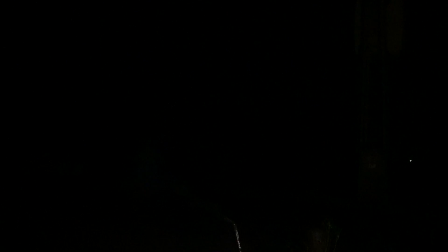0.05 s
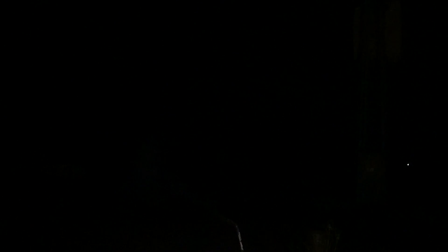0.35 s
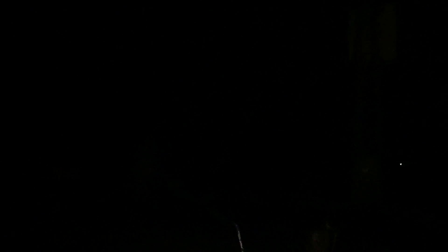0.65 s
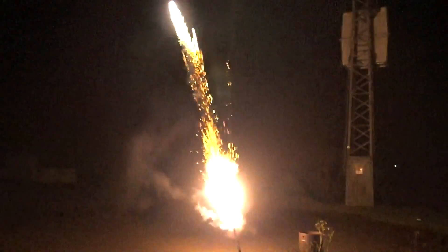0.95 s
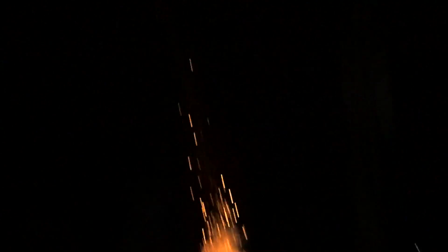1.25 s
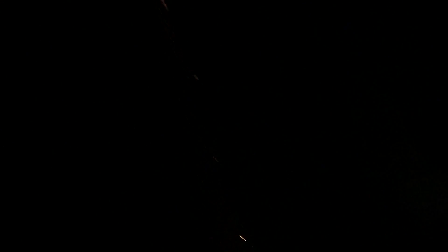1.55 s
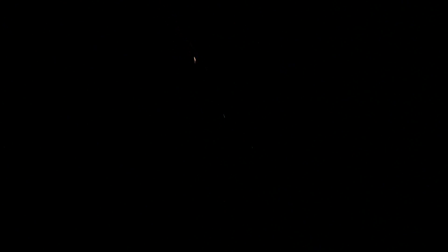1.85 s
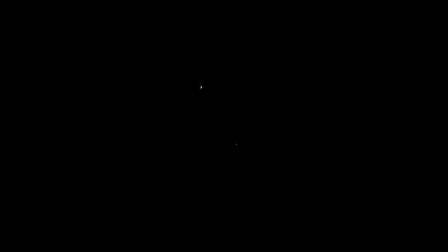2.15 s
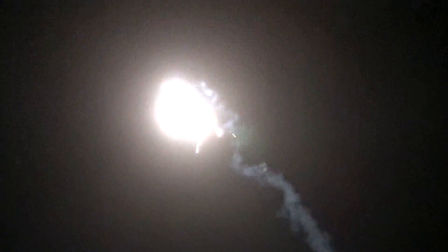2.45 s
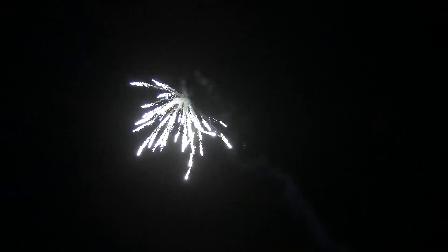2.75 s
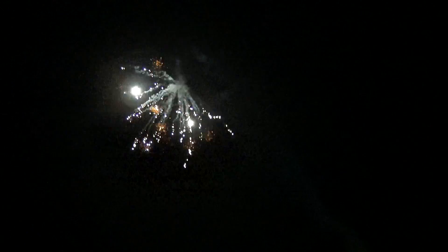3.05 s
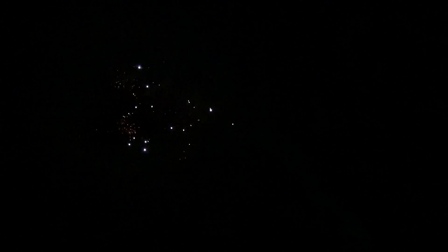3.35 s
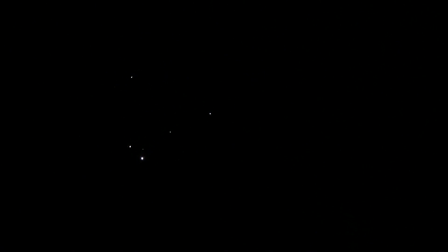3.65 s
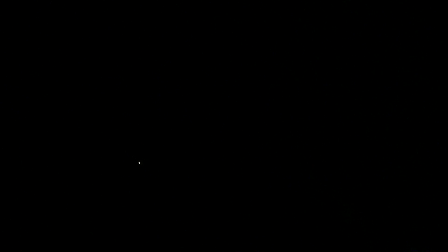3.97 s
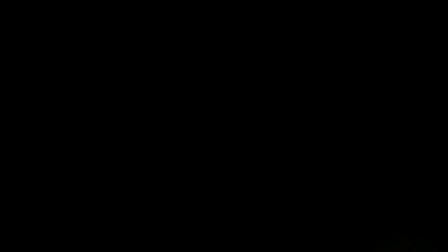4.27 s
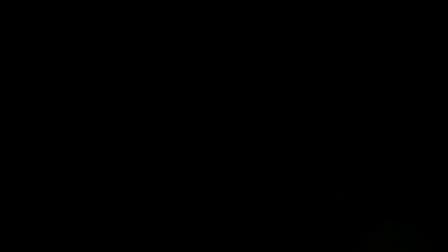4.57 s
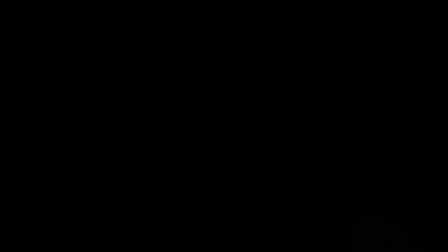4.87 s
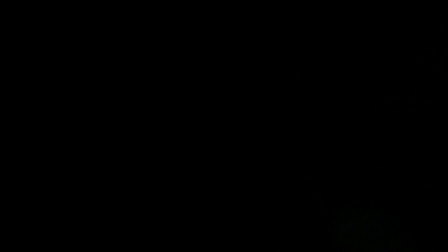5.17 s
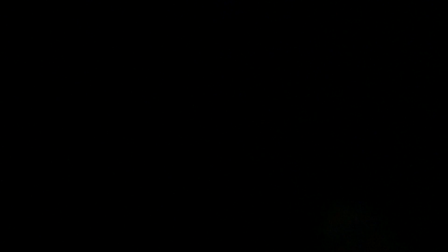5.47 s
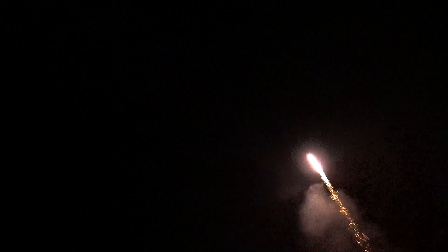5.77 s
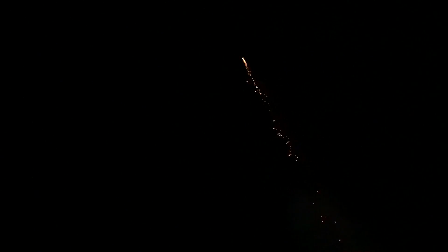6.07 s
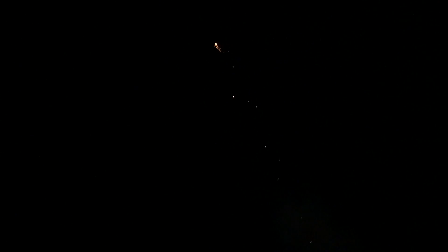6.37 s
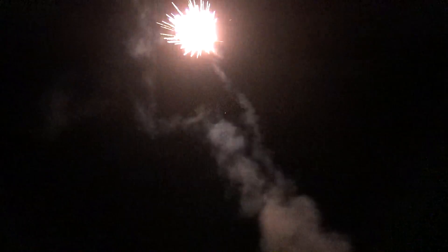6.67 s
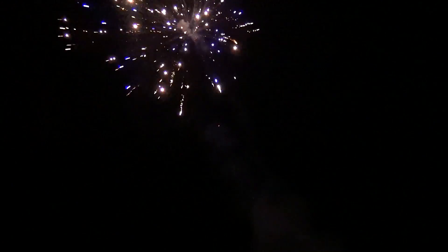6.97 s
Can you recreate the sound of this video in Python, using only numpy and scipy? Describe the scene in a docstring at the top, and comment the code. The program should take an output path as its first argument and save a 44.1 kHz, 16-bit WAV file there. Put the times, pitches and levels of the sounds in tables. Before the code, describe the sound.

After a few small knocks in a faint breeze, a large firework tube fires with a loud thump. The shell hums faintly as it climbs, then bursts overhead with a sharp bang and a flurry of crackling stars. A soft echo returns from far away. A second shell launches and bursts the same way, without crackle. Each blast rolls across open ground and briefly overloads the microphones.

```python
"""A faint breeze and a few small knocks, then a thump: a large firework tube fires the first of two shells.
Each hums upward through the night and bursts high overhead; the first throws out crackling stars.
Every blast is a shock wave that slaps off nearby structures and rolls over the land as reverberation,
and the first burst comes back late from far off. The blasts overload a pair of microphones."""
import sys
import numpy as np
from scipy import signal
from scipy.fft import rfft, irfft, next_fast_len
from scipy.io import wavfile

SR = 44100
rng = np.random.default_rng(int(sys.argv[2]) if len(sys.argv) > 2 else 0)


def store_wav(level_fs):
    """Save 16-bit WAV to argv[1]."""
    pcm = np.round(np.clip(np.atleast_2d(level_fs), -1, 1) * 32767)
    wavfile.write(sys.argv[1], SR, pcm.T.astype(np.int16))


N = 309611
T = np.arange(N) / SR


def undb(db):
    """Decibels to amplitude ratio."""
    return 10 ** (np.asarray(db) / 20)


def unit(x):
    """Normalisation to rms 1."""
    return x / np.sqrt(np.mean(x ** 2))


def butter(x, hz, kind, order=2):
    """Causal low-pass or high-pass filter."""
    return signal.sosfilt(signal.butter(order, min(hz, .45 * SR), kind, fs=SR, output="sos"), x)


def colour(x, spectrum):
    """Spectral shaping by an outline of (frequency_hz, gain_db) points."""
    size = next_fast_len(x.shape[-1])
    hz, db = np.transpose(spectrum)
    gain = undb(np.interp(np.log(np.fft.rfftfreq(size, 1 / SR) + 1), np.log(hz), db))
    return irfft(rfft(x, size) * gain, size)[..., :x.shape[-1]]


def resonate(x, hz, width_hz):
    """A single resonance, gain 1 at its centre."""
    return signal.lfilter(*signal.iirpeak(hz, hz / width_hz, fs=SR), x)


def add(out, start_s, sound):
    """Superposition: a sound joins the mix at its start time."""
    i = max(int(start_s * SR), 0)
    part = sound[..., :max(N - i, 0)]
    out[:, i:i + part.shape[-1]] += part


def wander(rate_hz):
    """Slow random modulation: straight lines between random values."""
    knots = rng.standard_normal(N // 20)
    return 1.83 * np.interp(T * rate_hz, np.arange(len(knots)), knots)


def swell_at(centre_s, half_s):
    """A bell-shaped envelope around a moment."""
    return np.exp(-((T - centre_s) / half_s) ** 2)


def microphone_pair(wave, lag_samples):
    """Path difference: an oblique wave reaches one microphone before the other."""
    return np.array([np.pad(wave, (10 + lag, 10 - lag)) for lag in (0, lag_samples)])


# How unlike the two microphones hear diffuse sound: frequency_hz, side_over_mid_db
STEREO_WIDTH = [(25, -4.5), (60, -17), (125, -17.5), (250, -12.5), (500, -10.5), (1000, -8.5), (2000, -5),
                (4000, -1.5), (12000, 0.5)]
def diffuse(uneven_db):
    """Diffuse field: dense, uneven arrivals from all sides, partly coherent at two close microphones."""
    strength = undb(uneven_db * np.repeat(rng.standard_normal(N // 32 + 1), 32)[:N])
    mid, side = rng.standard_normal((2, N)) * strength
    side = colour(side, STEREO_WIDTH)
    return unit(np.array([mid + side, mid - side]))


def band(hz, half_width_hz):
    """Narrow-band noise: random modulation spreads a steady or gliding tone into a breathy band."""
    phase = 2 * np.pi * np.cumsum(np.broadcast_to(hz, N)) / SR
    flutter = butter(diffuse(uneven_db=1.5), half_width_hz, "low")
    return unit(flutter * np.cos(phase) + flutter[:, ::-1] * np.sin(phase))


# Spectrum of the night air: frequency_hz, gain_db
AIR_SPECTRUM = [(15, -9.5), (30, 4), (45, -5), (70, -17.5), (200, -19.5), (450, -27.5), (1000, -29),
                (2500, -35), (5000, -42.5), (9000, -44.5), (16000, -47.5)]
# Gusts on the microphones: centre_s, level_db, half_length_s
WIND_GUSTS = [(1.466, -40, 0.16), (2.1, -46, 0.68), (3.8, -50.5, 0.39), (4.267, -37, 0.037),
              (6.3, -47.5, 0.39)]
# Course of the distant hush: time_s, level_db
HUSH_LEVELS = [(0, -45.5), (2.3, -47), (4.1, -49), (7, -45.5)]
def night_air(breeze_db=-52):
    """Wind noise: a light, gusty breeze rumbles on the microphones over a faint distant hush."""
    air = unit(colour(diffuse(uneven_db=-1), AIR_SPECTRUM))
    gust_power = sum((undb(db) * swell_at(s, half_s)) ** 2 for s, db, half_s in WIND_GUSTS)
    breeze = np.sqrt(undb(breeze_db) ** 2 + gust_power)
    rumble = butter(air, 115, "low") * breeze * undb(2 * wander(4.5))
    hush_db = np.interp(T, *np.transpose(HUSH_LEVELS)) + 0.46 * wander(9)
    return rumble + butter(air, 83, "high") * undb(hush_db)


# Small knocks, scuffs and distant snaps: start_s, level_db, pitch_hz, decay_s
KNOCKS = [(0.065, -43, 1010, .01), (0.106, -36, 200, 0.0035), (0.284, -38.5, 2450, 0.0037),
          (0.293, -33, 2070, 0.0026), (0.3, -40, 3000, 0.0056), (0.311, -46.5, 3160, 0.026),
          (0.549, -42.5, 394, 0.011), (0.575, -33.5, 370, 0.015), (0.584, -39, 920, 0.088),
          (0.597, -29.5, 795, 0.0056), (0.643, -43, 780, 0.0046), (0.724, -57, 1700, 0.0036),
          (0.82, -43.5, 200, 0.02), (0.86, -44, 252, 0.017), (4.35, -45, 4500, 0.0038),
          (4.625, -33.5, 1250, 0.044)]
def knocks():
    """Damped resonance: each short, dull contact dies away in one broad band."""
    out, grit = np.zeros((2, N)), diffuse(uneven_db=4)
    size = SR // 4
    age = T[:size]
    for k, (start_s, db, hz, decay_s) in enumerate(KNOCKS):
        contact = butter(grit[:, k * size:(k + 1) * size], 4 * hz, "low", order=1)
        ring = unit(resonate(contact, hz, width_hz=1.2 * hz))
        envelope = np.minimum(age / (0.11 * decay_s), 1) * np.exp(-age / decay_s)
        add(out, start_s, undb(db) * ring * envelope)
    return out


def far_echo(crest_s=4.03, rise_db_per_s=35, fade_db_per_s=7.5, return_s=4.11, from_hz=790, to_hz=581):
    """Long-path echo: the first burst returns as a soft band that sinks as the path grows longer."""
    before, after = np.maximum(crest_s - T, 0), np.maximum(T - crest_s, 0)
    core = band(to_hz + (from_hz - to_hz) * np.exp(-after / .36), half_width_hz=189)
    skirt_spectrum = [(100, -16), (350, -8.5), (700, -1.5), (1500, -5), (3000, -19.5), (6000, -50)]
    skirt = undb(-5) * unit(colour(diffuse(uneven_db=2.5), skirt_spectrum))
    wash = undb(-37 - rise_db_per_s * before - fade_db_per_s * after)
    # one strong return stands out just after the crest of the wash
    strong = np.where(T < return_s, swell_at(return_s, 0.064), np.exp(-abs(T - return_s) / 0.085))
    envelope = np.hypot(wash, undb(-33) * strong) * undb(0.33 * wander(25))
    return (T > SHELL_BURSTS[0][0]) * (core + skirt) * envelope


def roll(start_s, shape, spectrum, echoes, attack_s, swell_db, treble_attack_s,
         fade_db_per_s, boom_db, boom_decay_s):
    """Reverberation: reflections off ground and trees swell as more land is reached, then fall away."""
    level_db, treble_db, hold_s, release_db_per_s, late_db = shape
    age = np.maximum(T - start_s, 0)
    field = colour(diffuse(uneven_db=2), spectrum)
    body, treble = (unit(butter(field, 1800, kind, order=4)) for kind in ("low", "high"))
    echo_power = sum((undb(db) * swell_at(start_s + delay_s, half_s)) ** 2
                     for delay_s, db, half_s in echoes)

    def envelope(rise_s, held_s, echo_db):
        """Attack, hold and release; the late echoes add in power."""
        past = np.maximum(age - held_s, 0)
        late_power = undb(late_db) ** 2 * (undb(-fade_db_per_s * past) ** 2
                                           + undb(echo_db) ** 2 * echo_power)
        return np.minimum(age / rise_s, 1) * np.sqrt(undb(-release_db_per_s * past) ** 2 + late_power)

    # a low boom comes first; the treble arrives later and leaves sooner
    boom = unit(butter(colour(diffuse(uneven_db=-1.5), spectrum), 378, "low", order=4))
    boom *= undb(boom_db) * np.minimum(age / attack_s, 1) * np.exp(-age / boom_decay_s)
    body *= envelope(attack_s, hold_s, echo_db=0) * undb(-swell_db * np.maximum(1 - age / hold_s, 0))
    treble *= envelope(treble_attack_s, 0.9 * hold_s, echo_db=-2.5) * undb(treble_db)
    return undb(level_db + 0.93 * wander(70)) * (boom + body + treble)


# The roll of each lift and each burst: level_db, treble_gain_db, hold_s, release_db_per_s, late_gain_db
LIFT_ROLL_SHAPES = [(-17.5, -2.5, 0.18, 131, -16), (-17, -8.5, 0.14, 127, -22)]
BURST_ROLL_SHAPES = [(-14.5, -11.5, 0.2, 170, -7), (-13.5, -11.5, 0.2, 85, -20)]
# Spectra of the rolls: frequency_hz, gain_db
LIFT_ROLL_SPECTRUM = [(25, -16), (70, -1.5), (120, 9), (250, 6), (600, 10.5), (1000, 6.5), (1700, -9),
                      (3500, -20.5), (8000, -30), (10000, -36.5), (16000, -45)]
BURST_ROLL_SPECTRUM = [(25, -32), (70, -13.5), (150, -8), (300, -5), (600, 1.5), (1000, -3), (1700, -9),
                       (3500, -13.5), (8000, -25.5), (10000, -29), (16000, -42.5)]
# Broad echoes from the surroundings: delay_s, gain_over_late_db, half_length_s
LIFT_ECHOES = [(0.303, 5.5, 0.029), (0.404, -1.5, 0.027), (.55, -7, .03)]
BURST_ECHOES = [(.297, -1, 0.022), (.455, -1.5, 0.065)]
def rolls():
    """Fixed echo paths: blasts from the same spot roll over the land with the same delays."""
    ground = sum(roll(lift[0], shape, LIFT_ROLL_SPECTRUM, LIFT_ECHOES, attack_s=0.025, swell_db=3.5,
                      treble_attack_s=0.053, fade_db_per_s=28, boom_db=-8, boom_decay_s=0.087)
                 for lift, shape in zip(LIFT_CHARGES, LIFT_ROLL_SHAPES))
    sky = sum(roll(burst[0], shape, BURST_ROLL_SPECTRUM, BURST_ECHOES, attack_s=.015, swell_db=3,
                   treble_attack_s=0.079, fade_db_per_s=21, boom_db=-1.5, boom_decay_s=0.15)
              for burst, shape in zip(SHELL_BURSTS, BURST_ROLL_SHAPES))
    return ground + sky


# Modes of the hum: harmonic_number, half_width_hz, gain_db
HUM_MODES = [(1, 77, 5.5), (3, 78, 3.5), (5, 150, -1), (7, 150, -6.5)]
# Climbing shells: start_s, end_s, start_pitch_hz, end_pitch_hz, hum_db, rolloff_db_per_octave,
# hiss_crest_s, hiss_db, hiss_fade_s
SHELL_FLIGHTS = [(1.451, 2.399, 950, 875, -52.5, 4, 1.94, -61, 0.55),
                 (6.029, 6.805, 547.4, 525, -56.5, -2.5, 6.32, -54, 0.44)]
def flights():
    """Stopped-pipe resonance: a shell hums in odd harmonics, sagging as it slows; its tail fizzes."""
    out = np.zeros((2, N))
    hiss_spectrum = [(1000, -16.5), (4000, 1), (8500, 2), (11000, -7), (16000, -11)]
    for start_s, end_s, from_hz, to_hz, hum_db, rolloff, crest_s, hiss_db, fade_s in SHELL_FLIGHTS:
        pitch_hz = np.interp(T, [start_s, end_s], [from_hz, to_hz])
        hum = unit(sum(undb(db - rolloff * np.log2(k)) * band(k * pitch_hz, half_width_hz)
                       for k, half_width_hz, db in HUM_MODES))
        hiss = unit(colour(diffuse(uneven_db=1), hiss_spectrum)) * np.exp(-abs(T - crest_s) / fade_s)
        burning = np.clip((T - start_s) / 0.076, 0, 1) * (T < end_s)
        out += burning * (undb(hum_db) * hum + undb(hiss_db) * hiss)
    return out


# Gas escaping just before each shell leaves: centre_s, pitch_hz, half_width_hz, level_db, half_length_s
GAS_SQUEALS = [(0.955, 3410, 900, -23, 0.012), (5.675, 4440, 110, -37, 0.014)]
def squeals():
    """Flow noise: gas squeals briefly through the gap between shell and tube."""
    return sum(undb(db) * band(hz, half_width_hz) * swell_at(centre_s, half_s)
               for centre_s, hz, half_width_hz, db, half_s in GAS_SQUEALS)


def shock(pulse_ms, low_hz, top_hz):
    """Blast wave: a sudden overpressure, then a longer shallow suction; air rounds the front."""
    age = T[:SR // 25] / (pulse_ms / 1000)  # in pulse lengths
    pressure = (1 - age) * np.exp(-age)
    wave = butter(butter(pressure, low_hz, "high", order=1), top_hz, "low")
    return wave / wave.max()


def lesser_stars(count=36, start_s=3.04, end_s=3.44):
    """Random ignition: the lesser stars go off at irregular moments while the cloud burns."""
    jitter, size = rng.random((count, 2)).T
    times_s = start_s + (end_s - start_s) * (np.arange(count) + jitter) / count
    levels_db = 2.5 - rng.standard_normal(count)
    pulses_ms = 0.24 * 2 ** (size - .5)
    return list(zip(times_s, levels_db, pulses_ms))


# The loudest crackling stars: start_s, level_db, pulse_ms
LOUD_STARS = [(2.703, 4, 0.086), (3.0007, 14, 0.084), (3.0085, 5.5, 0.21), (3.0149, 1, 0.17),
              (3.0381, 10, 0.18), (3.0441, 12, 0.074), (3.0625, 12.5, 0.099), (3.0707, 10, 0.19),
              (3.1083, 10, 0.071), (3.1264, 8, 0.18), (3.1505, 10, 0.19), (3.154, 4, 0.2),
              (3.1591, 8, 0.24), (3.1742, 6, 0.068), (3.204, 13, 0.1), (3.2097, 10.5, 0.15),
              (3.214, 12, 0.14), (3.2185, 7, 0.095), (3.2207, 11.5, .17), (3.2419, 5, 0.21),
              (3.2566, 8, 0.105), (3.2594, 8, 0.066), (3.2888, 10, .18), (3.3095, 10, 0.19),
              (3.3265, 12.5, 0.11), (3.3356, 11, .19), (3.3497, 5.5, 0.26), (3.3714, 7, .18),
              (3.3921, 10.5, .21), (3.3988, 8, 0.21), (3.4181, 12.5, 0.22), (3.4267, 9.5, 0.23),
              (3.4317, -3, 0.36), (3.4767, 11.5, 0.26), (3.4845, 5.5, 0.31), (3.4916, 10, 0.22)]
def crackle():
    """Scattering: stars explode as tiny blast waves, each from its own bearing; the ground echoes them."""
    direct, stars = np.zeros((2, N)), list(LOUD_STARS) + lesser_stars()
    for (start_s, db, pulse_ms), (pan, bearing) in zip(stars, rng.random((len(stars), 2))):
        wave = undb(db) * shock(pulse_ms, low_hz=420, top_hz=11500)
        balance = undb(np.array([[2.5], [-2.5]]) * (pan - .5))
        add(direct, start_s, balance * microphone_pair(wave, int(7 * (bearing - .35))))
    echo = ground_scatter(direct)
    # the low end of the scatter follows the smoothed power of the pops
    smoothing = 1 / (.03 * SR)
    power = signal.lfilter([smoothing], [1, smoothing - 1], direct[0] ** 2)
    thud_spectrum = [(30, -24), (130, 2), (350, -3), (900, 0.5), (4000, -21)]
    thud = unit(colour(diffuse(uneven_db=3.5), thud_spectrum)) * np.sqrt(power)
    bright_edge = resonate(direct, hz=7350, width_hz=2700)
    return undb(-2.5) * direct + undb(-11) * bright_edge + echo + undb(-15.5) * thud


# Spectrum of the stars' echo: frequency_hz, gain_db
SCATTER_SPECTRUM = [(40, -25), (130, 11), (500, -8.5), (1200, -0.5), (2500, 1.5), (5000, 0), (8000, 3),
                    (10000, -10), (16000, -23)]
def ground_scatter(pops):
    """Convolution: the ground's response takes a moment to build, so each pop stands clear of its echo."""
    field = unit(colour(diffuse(uneven_db=4.5), SCATTER_SPECTRUM))
    near = butter(field, 8400, "low") * np.exp(-T / 0.044) * undb(-37.5)
    far = butter(field, 5000, "low", order=3) * np.exp(-T / 0.23) * undb(-55.5)
    response = (near + far) * (1 - np.exp(-T / 0.038))
    return signal.fftconvolve(pops.mean(axis=0)[None], response[:, :2 * SR], axes=1)[:, :N]


def blast(peak_db, pulse_ms, slaps, facets=5):
    """Early reflection: slaps follow the direct wave; evenly stepped facets turn each into a short ring."""
    out = np.zeros((2, N))
    add(out, 0, shock(pulse_ms, low_hz=445, top_hz=14600))
    for delay_s, db, stretch, step_s in slaps:
        top_hz = 7000 / (1 + delay_s / .035)  # the longer the detour, the duller the slap
        wave = undb(db) * shock(pulse_ms * stretch, low_hz=330, top_hz=top_hz) / facets
        for facet, (jitter, bearing) in enumerate(rng.random((facets, 2))):
            arrival_s = delay_s + step_s * (facet + 0.41 * jitter)
            add(out, arrival_s, microphone_pair(wave, int(8 * (bearing - .35))))
    return undb(peak_db) * out[:, :SR // 2]


# Reflections of a blast on the ground: delay_s, gain_db, pulse_stretch, facet_step_s
LIFT_SLAPS = [(.0012, -16, .7, .00003), (.015, -19, .7, .00002), (.0496, -15, .9, .00002),
              (.149, -10, 1, .0015), (.1675, -11, .9, .0013)]
# Charges that launch the shells: start_s, peak_db, pulse_ms, rush_db, rush_rise_s, tube_pitch_hz
LIFT_CHARGES = [(0.9578, 20, .55, -11, .0075, 1020), (5.7012, 19.5, .55, -18, .03, 850)]
def lifts():
    """Pressure release: gas rushes past the shell ever louder until it leaves the tube with a thump."""
    out = np.zeros((2, N))
    gas_spectrum = [(60, -8), (300, -8), (850, 1), (1600, -3.5), (4200, -12.5), (6000, -13.5),
                    (16000, -28)]
    gas = unit(colour(diffuse(uneven_db=1.5), gas_spectrum))
    for start_s, peak_db, pulse_ms, rush_db, rise_s, tube_hz in LIFT_CHARGES:
        add(out, start_s, blast(peak_db, pulse_ms, LIFT_SLAPS))
        before, after = np.maximum(start_s - T, 0), np.maximum(T - start_s, 0)
        swell = np.exp(-(before / rise_s) ** 1.92 - after / 0.0068)
        ring = undb(-5) * band(tube_hz, half_width_hz=tube_hz / 8)
        # the tube sings first, the broad rush follows
        out += undb(rush_db) * (ring * swell ** .7 + gas * swell ** 1.25)
    return out


# Reflections of a blast in the sky: delay_s, gain_db, pulse_stretch, facet_step_s
BURST_SLAPS = [(.002, -16.5, 0.81, 0.00028), (.0093, -8, 0.45, 0.000011), (0.012, -16, 0.57, 0.000022),
               (0.019, -20, 2.5, 0.00065), (.038, -42, 1.6, .0014), (.05, -36, 2.3, .0006),
               (.293, -16, 1.26, 0.00119)]
# Shells exploding overhead: start_s, peak_db, pulse_ms
SHELL_BURSTS = [(2.4018, 22, .65), (6.7791, 22, .6)]
def bursts():
    """Shock radiation: each shell explodes in one blast wave that slaps off nearby structures."""
    out = np.zeros((2, N))
    for start_s, peak_db, pulse_ms in SHELL_BURSTS:
        add(out, start_s, blast(peak_db, pulse_ms, BURST_SLAPS))
    return out


def scene(left_over_right_db=1.03):
    """Superposition: all sources add, and a level difference sets them a little left of centre."""
    firework = lifts() + bursts() + squeals() + rolls() + crackle() + far_echo() + flights()
    balance = undb(np.array([[.5], [-.5]]) * left_over_right_db)
    return (firework + knocks() + night_air()) * balance


def record(dry, ceiling=.95, top_hz=16000):
    """Overload: the blast fronts clip flat, then a steep low-pass cuts the highest treble."""
    clipped = np.clip(dry, -ceiling, ceiling)
    return signal.sosfilt(signal.ellip(8, .2, 70, top_hz, fs=SR, output="sos"), clipped)


dry = scene()
out = record(dry)
store_wav(out)
```